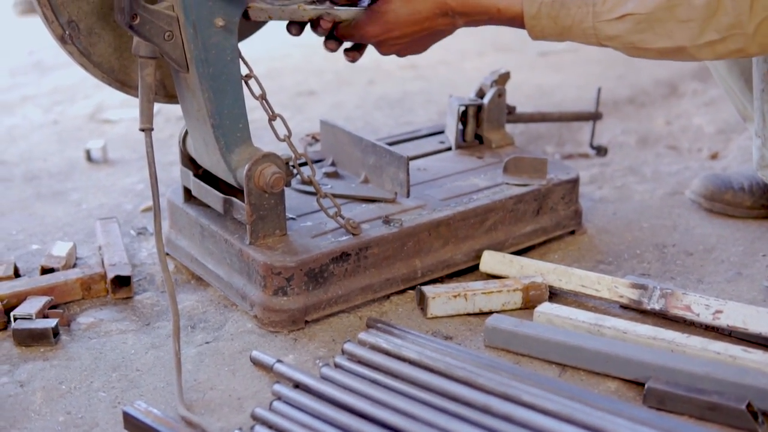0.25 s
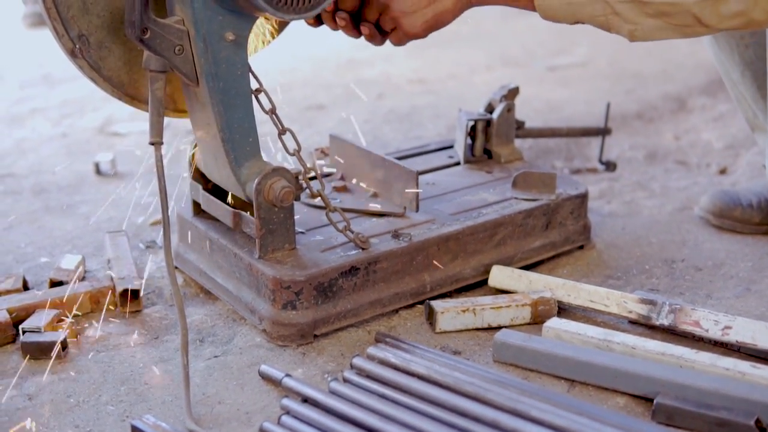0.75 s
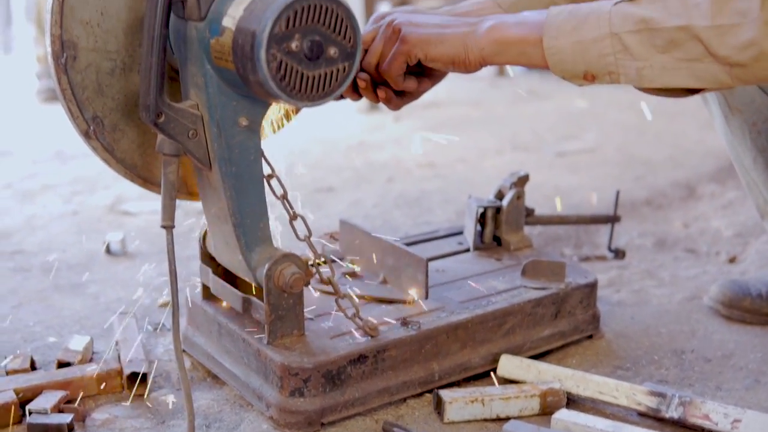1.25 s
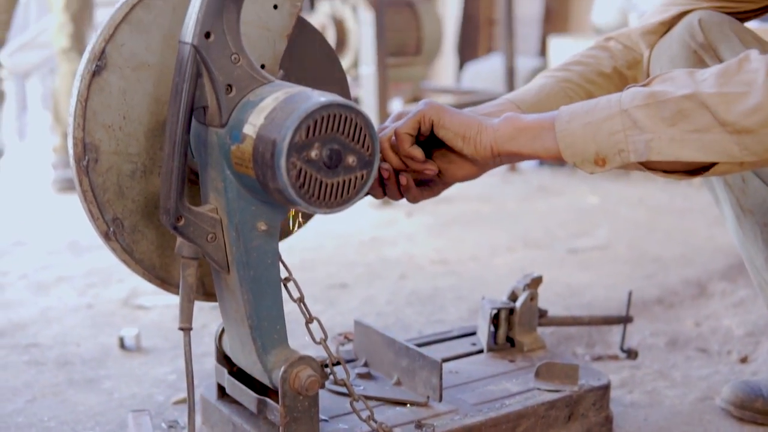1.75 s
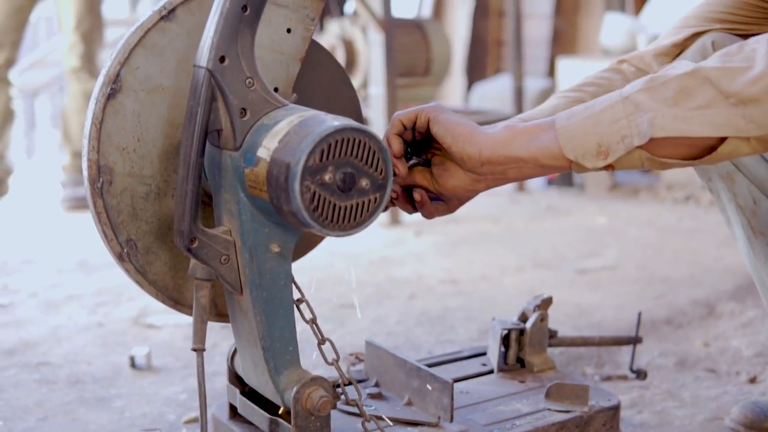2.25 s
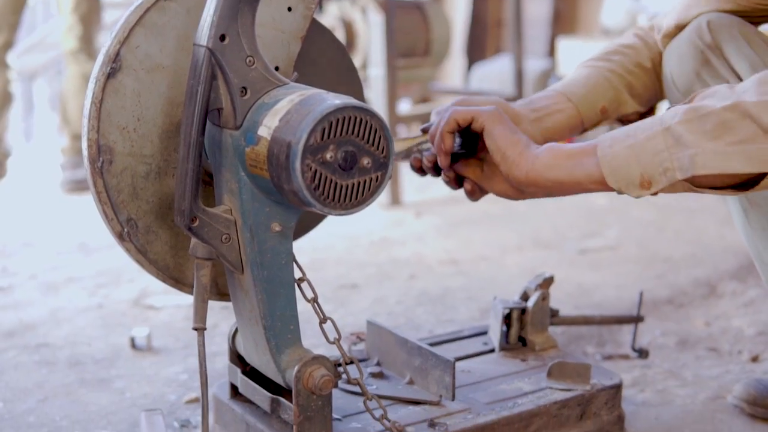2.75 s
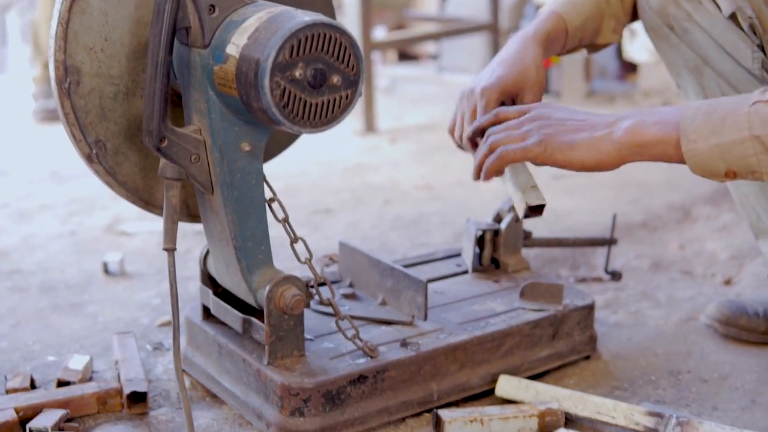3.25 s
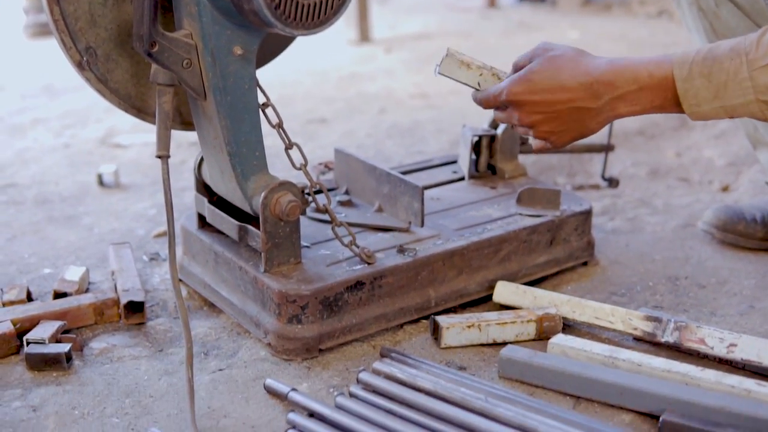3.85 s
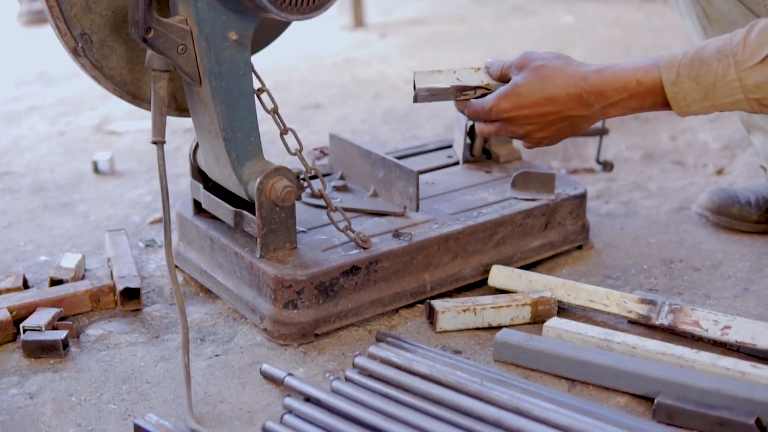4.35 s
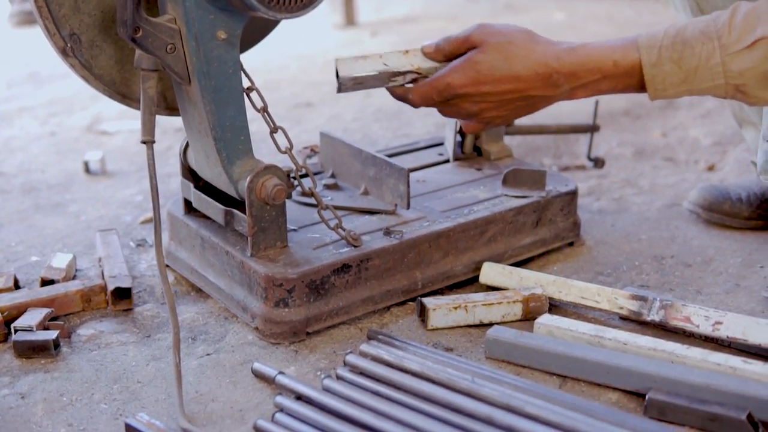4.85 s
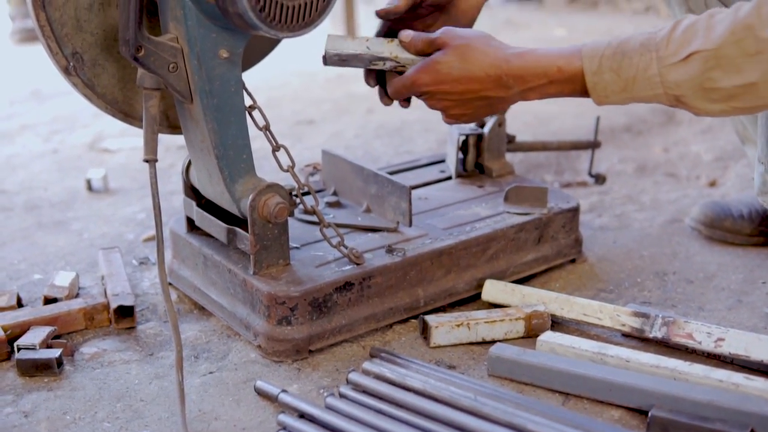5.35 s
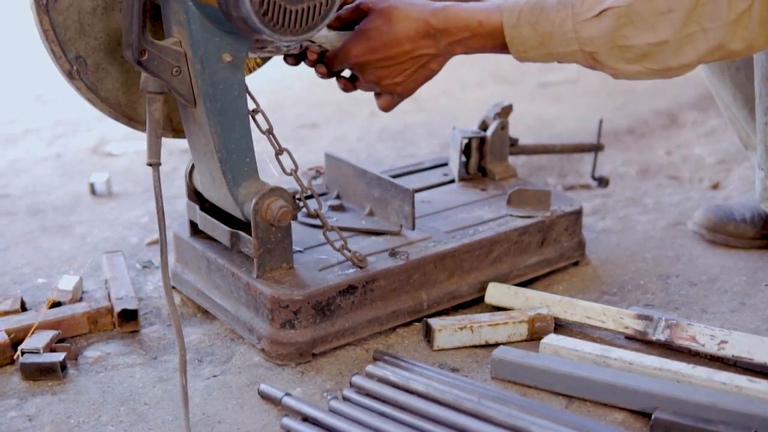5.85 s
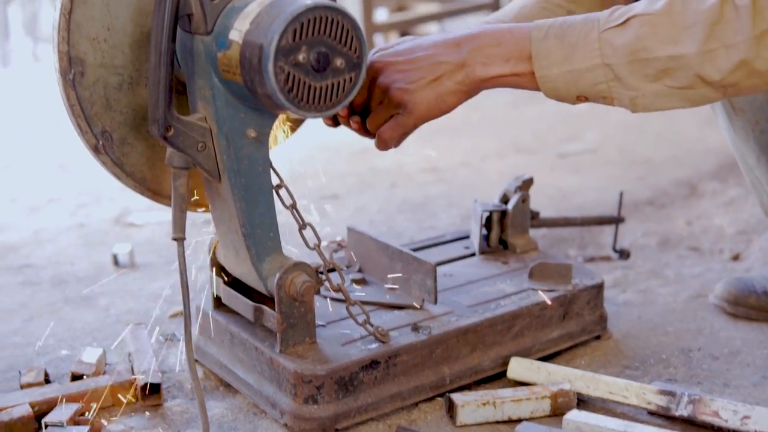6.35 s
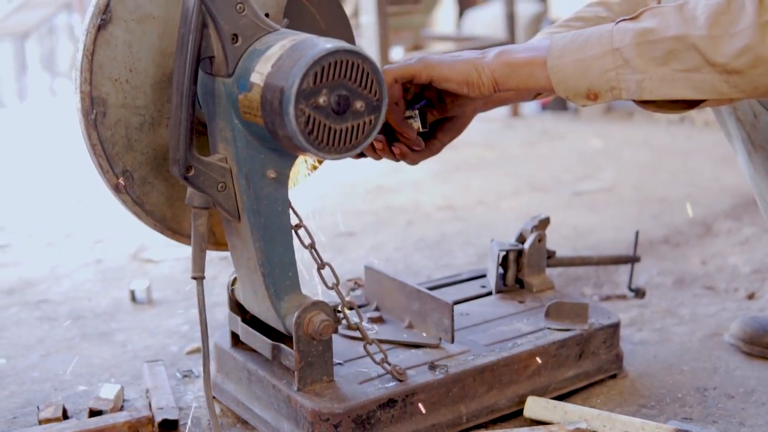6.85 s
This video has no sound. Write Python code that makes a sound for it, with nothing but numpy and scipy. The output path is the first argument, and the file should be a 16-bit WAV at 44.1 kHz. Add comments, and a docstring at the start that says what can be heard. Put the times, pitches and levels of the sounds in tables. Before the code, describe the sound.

Close to an abrasive cut-off saw in an open workshop. The whirring wheel soon bites into square steel tube with a dense, bright hiss, rasp and ringing, sagging in pitch. It breaks through abruptly, leaving a falling gear whine, low hum and faint tube knocks. The motor is switched on again with a jolt, rising howl and metallic rattles, then coasts into a second harsh cut. Dry stereo, with automatic level pumping.

```python
"""In a workshop, close by, an abrasive chop saw cuts square steel tube twice.
The wheel coasts down through each cut, and between the cuts a burst of the motor runs it up again with a howl.
Gears rush and whine with the speed, the guard rattles in decaying blows, the tube knocks, and a low hum goes on.
Grit, a dense noise of impacts, hisses in the slot and rings the tube through its resonances.
A gain control pushes drive and hum down under each cut and lets them swell back in the pause."""
import sys
import numpy as np
from scipy import signal
from scipy.fft import rfft, irfft, next_fast_len
from scipy.io import wavfile
from scipy.ndimage import uniform_filter1d, map_coordinates

SR = 44100
rng = np.random.default_rng(int(sys.argv[2]) if len(sys.argv) > 2 else 0)


def put_to_file(sound):
    """Save the sound as 16-bit audio at rate SR, in the file named by the first command-line argument."""
    columns = np.atleast_2d(sound).T  # one column per channel
    safe = np.clip(columns, -1, 1)
    whole_steps = np.round(safe * 32767)
    wavfile.write(sys.argv[1], SR, whole_steps.astype(np.int16))


N = 313551
TIME_S = np.arange(N) / SR
SIZE = next_fast_len(N + SR // 2)  # transform length, with room for decays
FREQS = np.arange(SIZE // 2 + 1) * SR / SIZE

# Partials of the hum. Each row: frequency in Hz, relative level in dB.
HUM_PARTIALS = [(86.4, -42), (115.2, -12), (143.8, 3.5), (173.5, -22), (202, -4), (230.4, 1), (259.2, -3),
                (346, -5.5)]
# Broad spectrum of the shop's low noise. Each row: frequency in Hz, relative level in dB.
SHOP_SLOPE = [(20, -23), (55, -7), (110, 1), (180, -9), (300, -8.5), (500, -14.5), (800, -9), (1500, -26),
              (8000, -48)]

# Broad spectra of gear rush, brushes, frame rumble and top treble of the drive noise.
# Each row: frequency in Hz, relative level in dB.
RUSH_SLOPE = [(100, -29), (250, -9.5), (500, -5), (900, -3.5), (1600, -4), (2400, -3), (3200, -8),
              (4500, -8.5), (7000, -25), (16000, -45)]
BRUSH_SLOPE = [(1500, -56), (3500, 0.5), (5000, -7.5), (7000, 0), (9000, -1.5), (12500, -2.5), (16000, -17)]
RUMBLE_SLOPE = [(20, -29), (55, 0.5), (110, 4.5), (200, -7.5), (400, -13), (1000, -44)]
TREBLE_SLOPE = [(6000, -25), (11000, -4), (14000, 11), (16000, -8)]
# Resonances of housing and guard. Each row: centre in Hz, width in Hz, lift in dB.
HOUSING_MODES = [(1200, 276, 10.5), (1610, 200, 0.5), (2030, 350, 4.5), (2950, 460, 3.5), (5420, 210, 10.5),
                 (6050, 570, 5), (8800, 190, 7)]
# Howl of the starting motor. Each row: time in seconds, frequency in Hz, relative level in dB.
HOWL_CURVE = [(4.03, 2100, -60), (4.07, 2290, -17), (4.16, 2340, -4), (4.22, 2720, -3), (4.27, 3060, -10),
              (4.33, 3180, -10), (4.45, 3380, -71)]

# Rattles of the guard. Each row: start in seconds, relative level in dB.
GUARD_RATTLES = [(4.033, -20), (4.038, -14), (4.116, -13), (4.1667, -10), (4.2984, -8), (4.3174, -4),
                 (4.351, -8), (4.377, -5), (4.4036, -14), (4.4313, -9), (4.4548, -21), (4.4845, -5.5),
                 (4.5256, -5), (4.6004, -4), (4.6432, 0), (4.683, -4.5)]
# Knocks of the tube as it is moved. Each row: start in seconds, relative level in dB.
TUBE_KNOCKS = [(2.846, -36.5), (2.933, -43), (3.269, -50), (3.622, -51), (3.836, -44)]

# Broad spectra of the four parts of the cut. Each row: frequency in Hz, relative level in dB.
HISS_SLOPE = [(2500, -32), (4200, -7), (5500, 1), (7500, 5), (10000, 4), (12000, 0), (16000, -0.5)]
SING_SLOPE = [(5000, -14.5), (7000, -5.5), (10000, -2.5), (13000, -1), (16000, -18.5)]
RASP_SLOPE = [(400, -16.5), (1000, -1), (1800, -7), (2800, -2.5), (3700, -3), (4700, -2.5), (6000, 0.5),
              (10000, -37)]
TUBE_SLOPE = [(200, -24.5), (450, -18.5), (750, -3.5), (1050, -2.5), (1400, 1.5), (2000, 1), (5000, -24)]
# Resonances on those spectra. Each row: centre in Hz, width in Hz, lift in dB.
HISS_RESONANCES = [(5460, 150, 8), (6040, 160, 5), (6550, 200, 0), (8500, 190, 4.5), (8600, 250, -0.5)]
SING_RESONANCES = [(7020, 790, 12.5), (8300, 350, 10.5), (9570, 230, 11.5), (11370, 300, 8.5),
                   (12500, 460, -13), (13800, 300, 15), (15100, 270, 11)]
RASP_RESONANCES = [(1710, 120, -6.5), (2410, 350, 5.5), (2956, 150, 3.5), (3220, 190, -4),
                   (4160, 250, -3.5), (4430, 220, 5.5)]
TUBE_RESONANCES = [(559, 8.3, 12.6), (791, 37, 7.5), (905, 120, 8.4), (1140, 45, 7.2), (1350, 66, 2.3)]
# Gliding tones: screeches, and two faint falling tones of the slowing whine and its lower octave.
# Each row: start in seconds, end in seconds, first frequency in Hz, last frequency in Hz, relative level in dB.
GLIDING_TONES = [(.37, .63, 6780, 7200, -26), (.37, .56, 13200, 13100, -19),
                 (0.489, 0.891, 8460, 7500, -18), (.6, 0.97, 1810, 1880, -22),
                 (0.679, 1.54, 5290, 5580, -22.5), (0.856, 1.31, 7250, 6480, -25),
                 (1.58, 2.025, 7150, 7100, -13), (1.624, 1.914, 8100, 8220, -14.5),
                 (2.147, 2.554, 721, 533, -33), (2.18, 2.499, 1377, 1149, -26),
                 (2.3, 2.755, 850, 857, -27.5), (2.451, 2.72, 10030, 10000, -16),
                 (2.25, 2.7, 11320, 11280, -17.5), (5.81, 6.215, 7020, 7370, -22),
                 (6.12, 6.48, 1830, 1835, -26), (6.527, 6.778, 7580, 7320, -16.5)]
# The cuts. Each row: wheel touches in seconds, wheel breaks through in seconds.
CUT_TIMES = [(.355, 2.695), (5.76, 7.3)]
# One curve for each cut, used as departures from its own mean.
# Each row: time in seconds, how hard the wheel bites in dB, level of the top treble in dB.
BITE_CURVES = [
    [(0.44, -27.5, -24), (0.52, -25, -25.5), (0.59, -32.5, -22), (0.65, -28.5, -25), (0.84, -22.5, -25.5),
     (0.93, -25.5, -18.5), (0.97, -29, -22.5), (1.34, -22, -27.5), (1.36, -24, -28.5), (1.61, -24.5, -24),
     (1.67, -27, -19.5), (2.02, -24.5, -29.5), (2.23, -24.5, -25.5), (2.68, -29, -21.5)],
    [(5.86, -27.5, -23), (5.98, -25, -22), (6.108, -30, -21), (6.304, -25, -25), (6.446, -24, -24),
     (6.574, -29.5, -19), (6.764, -26, -24), (7.1, -27.5, -27)],
]
# Laws of hiss, singing, rasp and tube ring, in this order.
# Each row: relative level in dB, dB gained per dB of bite, per dB of top treble, per second of cutting.
LAYER_LAWS = [(-9, 0.44, .5, -1.26), (-12, -.2, 1.4, -0.17), (-17.5, 1.88, 0, -.2), (-16.5, 1.1, 0, -1.54)]
# Modes of the walls that chatter once the slot is deep enough.
# Each row: centre in Hz, width in Hz, relative level in dB, dB per dB of bite, waking time in seconds of cutting.
WALL_MODES = [(877, 80, -21, .5, 1.02), (1297, 130, -21.5, 1.55, 0.61), (2535, 150, -21.5, -1.3, 1.46),
              (3360, 100, -26, 0.2, 1.37), (6120, 310, -21.5, .5, 0.41), (6900, 300, -21, -.3, 0.55)]

# Microphone pair.
# Each row: frequency in Hz, left minus right in dB, left lead in radians, floor and wall reflections in dB.
MICROPHONES = [(40, 0, 0.1, -33), (200, 0, -0.49, -38), (500, 1, -0.68, -3.5), (990, 2.5, -0.81, -6.5),
               (2020, 3.5, -0.61, -6), (2950, 2, -0.61, -7), (4500, 7, -0.98, -10), (8000, 4.5, -0.65, -5),
               (11400, 7.5, -1.17, -9), (15100, 3, -0.17, -6.5)]

# The motor is switched on once; speed is given as the pitch of the gear whine
SWITCH_ON_S, SWITCH_OFF_S, TORQUE_RISE_S = 4.034, 4.87, .008
FIRST_HZ, FULL_HZ, RUN_UP_S = 2906, 3220, .275
# Share of the speed lost to friction, and to the cut on top of it
COAST_LOSS_PER_S, CUT_LOSS_PER_S = .178, .165
# Relative levels of the drive's parts, and the powers of speed and torque by which they grow
RUSH_DB, BRUSH_DB, RUMBLE_DB, WHINE_DB, TREBLE_DB = -12.5, -17, -30.5, -22, -28
NOISE_POWER, RUMBLE_POWER, WHINE_POWER, TORQUE_POWER = 3.84, 2.7, 3.3, 0.29
# The gear case rings as the whine slides through its mode
WHINE_MODE_HZ, WHINE_MODE_WIDTH_HZ, WHINE_LIFT_DB = 2850, 186, 8.5

ENTER_S, LEAVE_DB_PER_S = 0.12, 299.5
CUT_DB, CUT_POWER = 4, 0.85  # all grinding is louder the faster the wheel turns
SAG_SHARE, SAG_AT_S, SAG_POWER = 0.076, 2.3, 5.4  # the thinning walls go flat late in the cut

ROOM_T60_S = 0.13
# Gain control: level that it holds, ratio, and a quick and a slow recovery
HOLD_DB, RATIO, GAIN_ATTACK_S = -18, 16.5, 0.0084
QUICK_DB_PER_S, SLOW_DB_PER_S, SLOW_BELOW_DB = 73, 6.5, 5
TOP_HZ = 15950


def undb(db):
    """Logarithmic level: decibels are converted to an amplitude ratio."""
    return 10 ** (np.asarray(db) / 20)


def unit(x):
    """Normalisation: the signal is scaled to rms 1."""
    return x / np.sqrt(np.mean(x ** 2))


def curves(rows):
    """Linear interpolation in time: each column of a timed table, sample by sample."""
    s, *columns = np.transpose(rows)
    return [np.interp(TIME_S, s, column) for column in columns]


def spectra(rows):
    """Interpolation in log frequency: each column of a frequency table, bin by bin."""
    hz, *columns = np.transpose(rows)
    return [np.interp(np.log(FREQS + 1), np.log(hz), column) for column in columns]


def resonance(hz, centre_hz, width_hz):
    """Resonance curve: a bell that is 1 at its centre and 1/2 at the edges of its width."""
    return 1 / (1 + (2 * (hz - centre_hz) / width_hz) ** 2)


def colour(x, slope, modes=()):
    """Linear filtering: a broad spectral slope with resonances standing on it; rms 1."""
    db = spectra(slope)[0]
    for hz, width_hz, lift_db in modes:
        db = db + lift_db * resonance(FREQS, hz, width_hz)
    return unit(irfft(rfft(x, SIZE) * undb(db), SIZE)[:N])


def walk(rate, size=N):
    """Low-frequency noise: a smooth random change about rate times a second; spread about 1."""
    hold = max(int(SR / rate), 2)
    steps = np.repeat(rng.standard_normal(size)[:size // hold + 1], hold)
    return 1.22 * uniform_filter1d(steps, hold)[:size]  # 1.22 makes up for the smoothing


def narrow(hz, width_hz, size=N):
    """Narrow-band noise: two random envelopes in quadrature on a carrier that may move; rms about 1."""
    phase = 2 * np.pi * np.cumsum(hz + np.zeros(size)) / SR
    return walk(width_hz, size) * np.cos(phase) + walk(width_hz, size) * np.sin(phase)


def grit(rate, spread_db):
    """Shot noise: dense tiny impacts of uneven size, a few much harder than the rest; rms 1."""
    strength = undb(spread_db * np.minimum(rng.exponential(size=N), 5))
    struck = rng.random(N) < rate / SR
    return unit(struck * strength * rng.standard_normal(N))


def blows(times, dbs, decay_s):
    """Impact excitation: envelopes that rise within a millisecond or two and decay exponentially."""
    out = np.zeros(N)
    age = TIME_S[:SR // 4]
    shape = (1 - np.exp(-age / 0.00033)) * np.exp(-age / decay_s)
    for s, db in zip(times, dbs):
        first = int(s * SR)
        out[first:first + len(age)] += undb(db) * shape
    return out


def shifting(x, depth_db, width_hz, hold_s, size=1024):
    """Time-varying resonance: neighbouring bands swell and fade, each on its own; rms 1."""
    hz, s, frames = signal.stft(x, SR, nperseg=size)
    chance = rng.standard_normal((400, 400))
    place = np.meshgrid(hz / width_hz, s / hold_s, indexing="ij")
    swell = map_coordinates(chance, place, order=3, mode="wrap")
    gain = undb(depth_db * np.clip(swell, -2, 1.5))
    return unit(signal.istft(frames * gain, SR, nperseg=size)[1][:N])


def shop(hum_db=-38.0, air_db=-37):
    """Additive synthesis: some other machine hums in wavering partials over the low noise of the shop."""
    clock = np.cumsum(1 + .004 * walk(6)) / SR  # shared pitch waver
    hum = np.zeros(N)
    for hz, db in HUM_PARTIALS:
        hum += undb(db + 2.3 * walk(7.5)) * np.sin(2 * np.pi * (hz * clock + rng.random()))
    return undb(hum_db) * unit(hum) + undb(air_db) * colour(rng.standard_normal(N), SHOP_SLOPE)


def contact(touch_s, through_s):
    """Contact envelope: the wheel sinks into the steel, grinds on, and falls silent as it breaks through."""
    enter = np.clip((TIME_S - touch_s) / ENTER_S, 0, 1)
    return enter * undb(-LEAVE_DB_PER_S * np.maximum(TIME_S - through_s, 0))


def motor():
    """Rotational inertia: the wheel coasts, braked by cuts, or nears full speed; whine Hz and torque 0-1."""
    cutting = sum(contact(*cut) for cut in CUT_TIMES)
    loss = np.cumsum(COAST_LOSS_PER_S + CUT_LOSS_PER_S * cutting) / SR
    coasting = FIRST_HZ * np.exp(-loss)
    lack = np.exp(-np.clip(TIME_S - SWITCH_ON_S, 0, SWITCH_OFF_S - SWITCH_ON_S) / RUN_UP_S)
    driven = FULL_HZ - (FULL_HZ - np.interp(SWITCH_ON_S, TIME_S, coasting)) * lack
    # after switching off, the losses act again
    driven = driven * np.exp(-np.maximum(loss - np.interp(SWITCH_OFF_S, TIME_S, loss), 0))
    torque = lack * np.clip((TIME_S - SWITCH_ON_S) / TORQUE_RISE_S, 0, 1) * (TIME_S < SWITCH_OFF_S)
    return np.where(TIME_S < SWITCH_ON_S, coasting, driven), torque


def gear_noise(speed, torque, idle_db, load_db):
    """Power summation: noise gain grows with speed and torque, over an idle rattle."""
    load = undb(load_db) * torque ** TORQUE_POWER
    return np.sqrt(speed ** (2 * NOISE_POWER) + undb(idle_db) ** 2 + load ** 2)


def drive(hz, torque, teeth=48, throb=0.097, flutter_db=.5, waver=0.001996, whine_rough=0.2,
          mode_hz=5420, mode_width_hz=280, octave_db=-1):
    """Gear meshing: teeth whine at the mesh rate, rush and brush noise throb with the wheel, the frame rumbles."""
    speed = hz / FULL_HZ
    mesh = 2 * np.pi * np.cumsum(hz * (1 + waver * walk(70))) / SR
    uneven = (1 + throb * np.sin(mesh / teeth)) * undb(flutter_db * walk(150))

    rush = undb(RUSH_DB) * gear_noise(speed, torque, idle_db=-30.5, load_db=-4)
    rush = rush * shifting(colour(grit(14000, 1), RUSH_SLOPE, HOUSING_MODES), .7, 180, .08)
    brush = undb(BRUSH_DB) * gear_noise(speed, torque * speed ** 2, idle_db=-39, load_db=-4)
    brush = brush * colour(grit(18000, 0.61), BRUSH_SLOPE, HOUSING_MODES)
    # top treble of the drive noise, growing with speed
    treble = undb(TREBLE_DB) * speed ** NOISE_POWER * colour(grit(18000, .6), TREBLE_SLOPE)

    # a housing mode rings out whenever the whine's octave slides through it
    octave = undb(octave_db) * narrow(mode_hz, 130) * resonance(2 * hz, mode_hz, mode_width_hz)
    case_db = WHINE_LIFT_DB * resonance(hz, WHINE_MODE_HZ, WHINE_MODE_WIDTH_HZ)
    whine = undb(WHINE_DB + case_db) * speed ** WHINE_POWER
    whine = whine * (np.sin(mesh) + whine_rough * narrow(hz, 90) + octave)
    rumble = undb(RUMBLE_DB) * speed ** RUMBLE_POWER * colour(grit(9000, 1), RUMBLE_SLOPE)
    return uneven * (rush + brush + treble) + whine + rumble


def start(jolt_db=-17, jolt_s=0.18, howl_db=-25.0):
    """Torque reaction: the motor jolts the frame, and a rough howl climbs as it gathers speed."""
    frame = [(150, -37), (330, -2), (800, -1.5), (1350, 2.5), (1900, -12), (5000, -40)]  # (Hz, dB)
    jolt = blows([SWITCH_ON_S], [jolt_db], jolt_s) * colour(grit(9000, 0.74), frame)
    hz, db = curves(HOWL_CURVE)
    return jolt + undb(howl_db + db) * narrow(hz, 240)


def guard(speed, body_db=-7.5, low_db=-12, high_db=-8, high_power=4.0, body_s=0.0064, ring_s=0.012,
          low_hz=5420, high_hz=9540):
    """Struck plate: the loose guard chatters, ringing brighter the faster the wheel; the tube knocks too."""
    s, db = np.transpose(GUARD_RATTLES)
    body = blows(s, db + body_db, body_s) + blows(*np.transpose(TUBE_KNOCKS), 0.015)
    metal = [(300, -4), (1200, -2), (4000, 0), (8000, 1.5), (13000, -1.5), (16000, -10)]  # (Hz, dB)
    clack = colour(grit(14000, 0.92), metal)
    low = undb(low_db) * narrow(low_hz, 240)
    high = undb(high_db) * speed ** high_power * narrow(high_hz, 520)
    return body * clack + blows(s, db, ring_s) * (low + high)


def gliding_tones(width_hz=85, width_share=0.032, swell_s=0.047):
    """Gliding narrow-band noise: screeches and two faint falling whine tones swell, glide and let go."""
    out = np.zeros(N + SR)
    for first_s, last_s, first_hz, last_hz, db in GLIDING_TONES:
        size = int((last_s - first_s) * SR)
        age = TIME_S[:size]
        swell = np.clip(np.minimum(age, age[::-1]) / swell_s, 0, 1)
        glide_hz = np.linspace(first_hz, last_hz, size)
        tone = narrow(glide_hz, width_hz + width_share * first_hz, size)
        out[int(first_s * SR):][:size] += undb(db) * swell * tone
    return out[:N]


def chatter(bite, cutting_s, left_s, wake_s=0.49, fade_s=0.46):
    """Plate modes: walls freed by the deepening slot ring, go flat, and fade just before they part."""
    sag = 1 - SAG_SHARE * (cutting_s / SAG_AT_S) ** SAG_POWER
    rings = np.zeros(N)
    for hz, width_hz, db, follow, after_s in WALL_MODES:
        awake = np.clip((cutting_s - after_s) / wake_s + .5, 0, 1)
        rings += undb(db + follow * bite) * awake * narrow(hz * sag, width_hz)
    return rings * np.clip(left_s / fade_s, 0, 1)


def grinding(speed, grain_db=0.32, surge_db=1.0):
    """Abrasive excitation: grit hisses in the slot; a light bite makes the wall sing, a hard one rasps and rings."""
    # the contact point wanders, so it keeps waking other modes of the steel
    hiss = shifting(colour(grit(20000, 1), HISS_SLOPE, HISS_RESONANCES), 2.8, 260, .14)
    sing = shifting(colour(grit(18000, 1.5), SING_SLOPE, SING_RESONANCES), 3.1, 280, .13)
    rasp = shifting(colour(grit(12000, 1), RASP_SLOPE, RASP_RESONANCES), 3, 130, .16)
    tube = shifting(colour(grit(9000, 1), TUBE_SLOPE, TUBE_RESONANCES), 2.6, 70, .15)
    out = gliding_tones()
    for (touch_s, through_s), rows in zip(CUT_TIMES, BITE_CURVES):
        means = np.mean(rows, axis=0)[1:]
        bite, top = (uniform_filter1d(c, size=SR // 16) - mean for c, mean in zip(curves(rows), means))
        cutting_s = np.clip(TIME_S, touch_s, through_s) - touch_s
        steel = chatter(bite, cutting_s, through_s - TIME_S)
        for layer, (db, by_bite, by_top, drift) in zip((hiss, sing, rasp, tube), LAYER_LAWS):
            steel = steel + undb(db + by_bite * bite + by_top * top + drift * cutting_s) * layer
        out = out + contact(touch_s, through_s) * steel
    grip_db = grain_db * walk(400) + surge_db * walk(45)  # the wheel grips unevenly
    return out * speed ** CUT_POWER * undb(CUT_DB + grip_db)


def reflections(spectrum, count=4):
    """Early reflections: short echoes of floor and walls shift as the hand-held microphones move."""
    age = TIME_S[:SR // 4]
    out = np.zeros(N)
    for _ in range(count):
        echoes = rng.standard_normal(len(age)) * undb(-60 * age / ROOM_T60_S) * (age > .002)
        heard = irfft(spectrum * rfft(echoes / np.linalg.norm(echoes), SIZE), SIZE)[:N]
        out += heard * np.sin(2 * np.pi * (np.cumsum(3 * walk(4)) / SR + rng.random()))
    return out * np.sqrt(2 / count)


def gain_control(x):
    """Dynamic compression: loud sound turns the gain down; it recovers quickly at first and then slowly."""
    power = np.mean(x ** 2, axis=0)
    keep = np.exp(-1 / (GAIN_ATTACK_S * SR))
    smooth = signal.lfilter([1 - keep], [1, -keep], power, zi=[np.mean(power[:SR // 20])])[0]
    over_db = 10 * np.log10(smooth) - HOLD_DB
    # each follower jumps to a peak and then falls at its own rate
    quick = np.maximum.accumulate(over_db + QUICK_DB_PER_S * TIME_S) - QUICK_DB_PER_S * TIME_S
    slow = np.maximum.accumulate(over_db + SLOW_DB_PER_S * TIME_S) - SLOW_DB_PER_S * TIME_S
    excess_db = np.maximum(np.maximum(quick, slow - SLOW_BELOW_DB), 0)
    return x * undb(-(1 - 1 / RATIO) * excess_db)


def scene():
    """Superposition: all sources reach two close microphones directly and by short reflections."""
    hz, torque = motor()
    speed = hz / FULL_HZ
    sources = shop() + drive(hz, torque) + start() + guard(speed) + grinding(speed)
    sound = rfft(sources, SIZE)
    pan_db, lead, wet_db = spectra(MICROPHONES)
    out = []
    for side in (1, -1):  # left, right
        port = sound * undb(side * pan_db / 2) * np.exp(.5j * side * lead)
        out.append(irfft(port, SIZE)[:N] + reflections(port * undb(wet_db)))
    return np.array(out)


def record(dry):
    """Band limiting: after the gain control, a steep low-pass filter removes the top of the spectrum."""
    low_pass = signal.ellip(12, .2, 80, TOP_HZ, fs=SR, output="sos")
    return signal.sosfilt(low_pass, gain_control(dry))


dry = scene()
out = record(dry)
put_to_file(out)
```